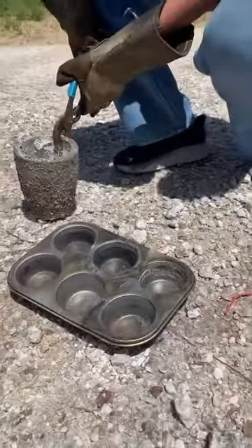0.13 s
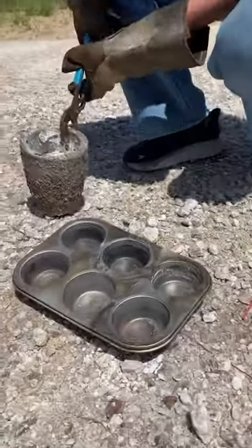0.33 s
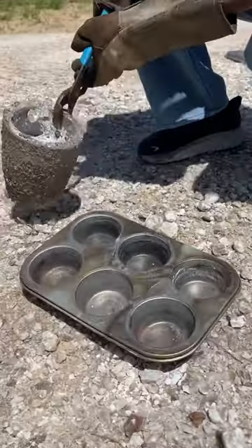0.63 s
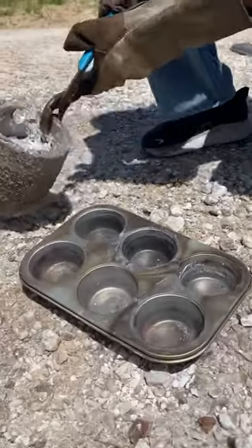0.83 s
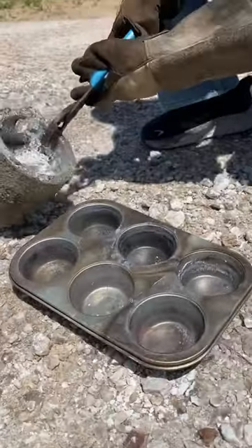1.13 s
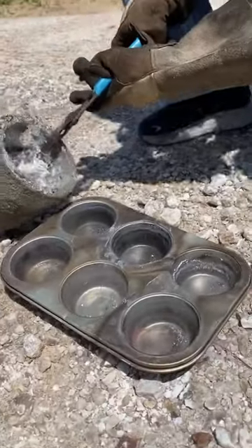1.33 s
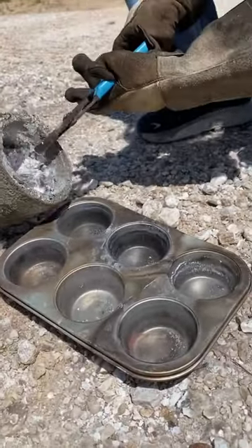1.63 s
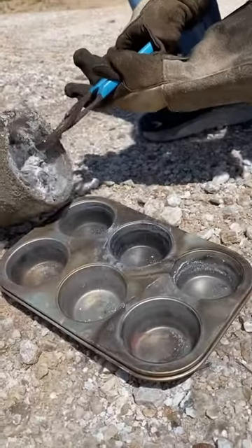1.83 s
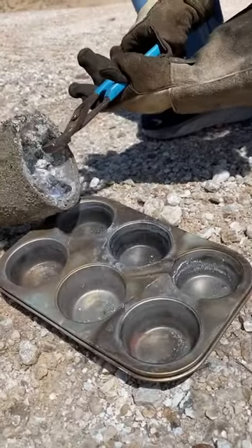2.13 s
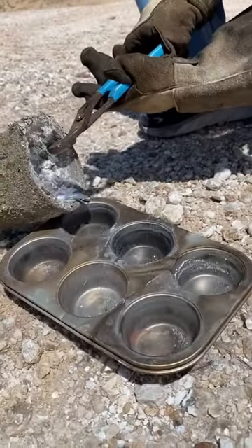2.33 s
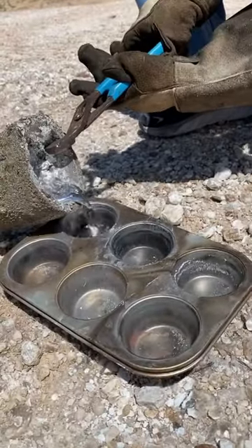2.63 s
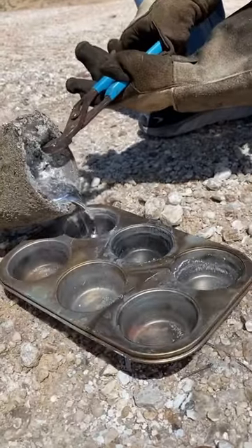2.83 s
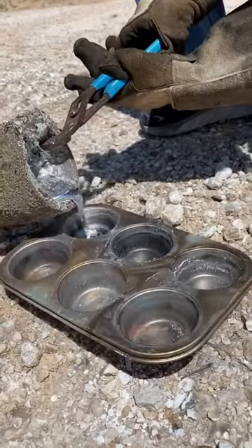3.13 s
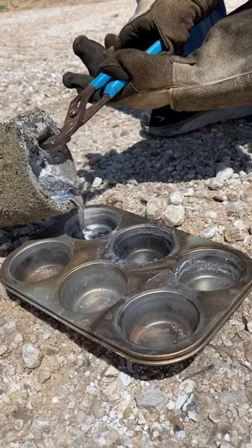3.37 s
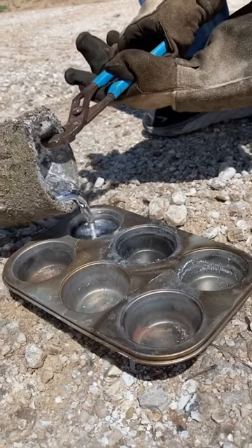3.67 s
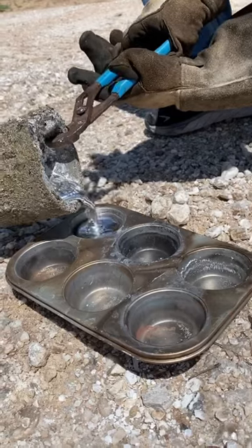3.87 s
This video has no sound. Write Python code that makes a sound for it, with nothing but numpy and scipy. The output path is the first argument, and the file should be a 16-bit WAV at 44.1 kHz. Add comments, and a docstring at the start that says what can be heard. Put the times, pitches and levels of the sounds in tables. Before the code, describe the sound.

Outdoors, close and dry: wind rumbles on the microphone and grit crunches, then a bright tinny clank with quick bounces and a thin clink, a brief stuttering scrape, and very faint sizzling to the end.

```python
"""Wind buffets the microphone outdoors and grit crunches underfoot, over soft air hiss and faint hums.
A crucible in tongs clanks on a steel muffin tin: cracks, ringing modes, a clink and a stick-slip scrape.
Molten metal is a faint sizzle of random spits that lies under it all and grows towards the end.
Sharp ticks, one in the grit and two from the metal, are tiny noise puffs; the wind is shaped noise
plus single low thumps."""
import sys
import numpy as np
from scipy import signal
from scipy.fft import rfft, irfft
from scipy.io import wavfile
from scipy.ndimage import uniform_filter1d

SR = 44100
rng = np.random.default_rng(int(sys.argv[2]) if len(sys.argv) > 2 else 0)


def output_pcm(signal):
    """Save a mono or channel-first signal as 16-bit PCM at the path in sys.argv[1].

    Samples are clipped to [-1, 1] before scaling.
    """
    pcm = np.clip(np.atleast_2d(signal).T, -1, 1) * 32767
    wavfile.write(sys.argv[1], SR, np.round(pcm).astype(np.int16))


N = 176400

# Strongest modes of the steel tin. Each row: frequency in Hz, level in dB, t60 in seconds.
TIN_MODES = [(864, -7, .45), (955, -8, .2), (1181, -2, .33), (1411, -2, .55), (1614, -5, .22),
             (1700, 1, .22), (1828, 1, .22), (2026, 0, .25), (2081, 0, .3), (2467, 5, .22), (2790, -2, .2),
             (2889, -3, .22), (3009, 2, .25), (3097, 3, .35), (3300, -7, .3), (4085, -4, .2),
             (4376, -4, .2), (4673, -4, .22), (5432, -7, .22), (5820, -5, .22), (6017, -2, .16)]
# Strength of the wind at the microphone. Each row: time in seconds, level in dB.
WIND_LEVEL = [(0, -42), (0.1, -29), (0.26, -41), (0.35, -33), (0.43, -48), (0.5, -35), (0.57, -44),
              (0.72, -44), (0.8, -35), (0.92, -38.5), (1.0, -28.5), (1.12, -38), (1.35, -39), (1.46, -51),
              (1.65, -45), (1.86, -42), (1.93, -57), (2.08, -41.5), (2.32, -41), (2.58, -53.5), (2.69, -45),
              (2.95, -44), (3.1, -56), (3.3, -55.5), (3.58, -46.5), (3.65, -51.5), (3.72, -33.5),
              (3.77, -51), (3.86, -34.5), (3.91, -42), (3.965, -28), (4, -50)]
# Size of the unlike part of left and right, relative to the part they share
WIND_APART, AIR_APART, HIT_APART = 0.13, 0.38, 0.24
EDGE_HZ = 16000  # upper limit of the sound


def amp(db):
    """Decibels to gain."""
    return 10 ** (np.asarray(db) / 20)


def unit(x):
    """Scales to an rms of 1."""
    return x / np.sqrt(np.mean(x ** 2) + 1e-20)


def spectrum(points, hz):
    """Reads a table on a log-frequency axis."""
    table_hz, value = np.transpose(points)
    return np.interp(np.log(hz + 1), np.log(table_hz + 1), value)


def curve(points):
    """Reads a table over time, one value per sample."""
    return np.interp(np.arange(N) / SR, *np.transpose(points))


def wander(seconds):
    """Smooth random curve of rms 1 that changes over about this time."""
    span = max(int(seconds * SR), 2)
    once = uniform_filter1d(rng.standard_normal(N), span)
    return unit(uniform_filter1d(once, span))


def add(mix, start_s, sound):
    """Mixes a sound in from a start time, cutting it off at the end of the scene."""
    part = mix[:, round(start_s * SR):][:, :sound.shape[1]]
    part += sound[:, :part.shape[1]]


def pair(shape, apart):
    """Random values for left and right, mostly alike."""
    mid, side = rng.standard_normal((2,) + shape)
    return np.array([mid + apart * side, mid - apart * side])


def colour(x, points):
    """Filters a sound by a table of gains in dB over frequency."""
    hz = np.fft.rfftfreq(x.shape[-1], 1 / SR)
    return irfft(rfft(x) * amp(spectrum(points, hz)), x.shape[-1])


def band(x, centre_hz, octaves):
    """Keeps a bell-shaped band round a centre."""
    hz = np.fft.rfftfreq(x.shape[-1], 1 / SR) + 1
    bell = np.exp(-.5 * (np.log2(hz / centre_hz) / octaves) ** 2)
    return irfft(rfft(x) * bell, x.shape[-1])


def ring(modes, t):
    """Decaying sines of random phase, one row per mode."""
    hz, db, t60 = np.transpose(modes)[:, :, None]
    return amp(db - 60 * t / t60) * np.sin(2 * np.pi * (hz * t + rng.random(hz.shape)))


def bursts(rows, octaves, decay_s, apart):
    """Short dying puffs of noise, each in a broad band round its own centre."""
    out = np.zeros((2, N))
    t = np.arange(-SR // 50, SR // 10) / SR  # room ahead of the onset for the filter's spread
    for start_s, db, centre_hz in rows:
        noise = pair(t.shape, apart) * (t >= 0) * np.exp(-abs(t) / decay_s)
        puff = band(noise, centre_hz, octaves)
        same_energy = np.sqrt(decay_s * SR / np.sum(puff ** 2))
        add(out, start_s + t[0], amp(db) * puff * same_energy)
    return out


def air():
    """The soft hiss of the open air: steady coloured noise with a slowly moving level."""
    # Colour of the hiss. Each row: frequency in Hz, gain in dB.
    air_colour = [(50, 12), (350, 12.5), (900, 2), (2000, -2), (3300, -5), (4600, -4.5), (5100, 1.5),
                  (6500, -7), (8200, -14), (12500, -12.5), (16000, -39)]
    # Loudness of the hiss. Each row: time in seconds, level in dB.
    air_level = [(.6, -56.5), (.9, -59), (1.35, -57.5), (1.6, -61), (2.7, -57.5), (4, -57.5)]
    return amp(curve(air_level)) * unit(colour(pair((N,), AIR_APART), air_colour))


def hum():
    """Faint hollow hums: narrow, wavering bands of noise that swell and fade."""
    # Each row: middle in seconds, level in dB, centre in Hz.
    hum_swells = [(.5, -56, 576), (3.15, -63.5, 568), (3.15, -58, 325)]
    swell_s, octaves = 0.27, 0.16
    out, t = np.zeros((2, N)), np.arange(N) / SR
    for middle_s, db, centre_hz in hum_swells:
        swell = np.exp(-((t - middle_s) / swell_s) ** 2)
        out += amp(db) * swell * unit(band(pair((N,), AIR_APART), centre_hz, octaves))
    return out


def wind():
    """Lumpy low turbulence: deep noise evened out in level, then made to follow the gusts."""
    # Colour of the turbulence. Each row: frequency in Hz, gain in dB.
    wind_colour = [(20, -27), (50, 5), (75, 5.5), (130, -3), (220, -15.5), (700, -49), (4000, -100)]
    lump_db, lump_s = 2.5, 0.027
    flow = colour(pair((N,), WIND_APART), wind_colour)
    power = uniform_filter1d((flow ** 2).mean(0), size=1500)
    flow = flow / np.sqrt(uniform_filter1d(power, size=900))
    return flow * amp(curve(WIND_LEVEL) + lump_db * wander(lump_s))


def eddies():
    """Ragged thumps of eddies whose bass lags; stronger ones reach higher, small ones crowd into gusts."""
    # Single eddies striking the microphone. Each row: time in seconds, peak level in dB.
    strong_eddies = [(.003, -22.5), (.037, -22), (.062, -20), (.073, -23), (.093, -23.5), (.146, -26),
                     (0.159, -23.5), (0.22, -26), (.261, -32), (0.278, -30), (.519, -30.5), (.628, -25.5),
                     (.669, -30.5), (.763, -29), (0.814, -26), (.967, -29), (.978, -27.5), (1.010, -23.5),
                     (1.041, -21.5), (1.051, -24.5), (1.075, -27.5), (1.187, -27.5), (1.235, -29.5),
                     (1.265, -25), (1.338, -36), (1.701, -35), (2.11, -34.5), (2.251, -28.5),
                     (2.608, -39.5), (2.82, -37), (3.094, -40.5), (3.713, -31.5), (3.845, -36.5),
                     (3.948, -29)]
    top_at_0_db_hz, db_per_octave, low_hz = 1352, 17.5, 83  # upper edge, its fall with level, lower edge
    lag_cycles, wake_s, roughness = 1.1, 0.0063, 0.77
    most_per_s, small_db = 110, 0  # small eddies: rate in the strongest gust, peak relative to the wind
    out = np.zeros((2, N))
    t = np.arange(SR // 5) / SR
    hz = np.fft.rfftfreq(SR // 5, 1 / SR) + 1
    gust_db = curve(WIND_LEVEL)
    chance = most_per_s / SR * amp(gust_db - gust_db.max())
    hits = np.flatnonzero(rng.random(N) < chance)
    small_eddies = [(i / SR, gust_db[i] + small_db) for i in hits]
    for strike_s, db in strong_eddies + small_eddies:
        top_hz = top_at_0_db_hz * 2 ** (db / db_per_octave)
        low_edge = 1 + (low_hz / hz) ** 4
        high_edge = np.hypot(1, (hz / top_hz) ** 5)
        size = 1 / hz / low_edge / high_edge
        wake = unit(rfft(pair(t.shape, WIND_APART) * np.exp(-t / wake_s)))
        # Each frequency arrives late by the same number of its own cycles
        lag = np.exp(2j * np.pi * (rng.random() - lag_cycles * np.log(hz)))
        thump = irfft(size * (1 + roughness * wake) * lag)
        add(out, max(strike_s - 1 / top_hz, 0), amp(db) * thump / abs(thump).max())
    return out


def grit():
    """Grit crunching underfoot: each crunch is a short puff of mid-range noise."""
    # Each row: start in seconds, level in dB, centre in Hz.
    grit_crunches = [(.4065, -44.5, 1400), (.4455, -46, 2170), (.6314, -48.5, 1420), (.6595, -44.5, 1240),
                     (.6882, -44, 1860), (1.084, -52, 1190), (1.1093, -47.5, 1040), (1.1936, -51, 1270),
                     (1.254, -53, 1700)]
    return bursts(grit_crunches, octaves=0.57, decay_s=0.0041, apart=HIT_APART)


def ticks():
    """Sharp ticks, first the click of a grit crunch, then two of the metal: very short, wide, bright puffs."""
    # Each row: start in seconds, level in dB, centre in Hz.
    tick_hits = [(.447, -39, 4200), (2.4182, -37.5, 3300), (3.6866, -34, 4600)]
    return bursts(tick_hits, octaves=0.93, decay_s=0.00066, apart=HIT_APART)


def pour():
    """Tiny spits of molten metal sizzle in uneven surges and set the tin ringing faintly."""
    # The running metal. Each row: time in seconds, level in dB.
    pour_level = [(2.3, -69.5), (2.5, -66.5), (3.1, -68.5), (3.45, -65), (4, -65.5)]
    # Colour of the sizzle. Each row: frequency in Hz, gain in dB.
    sizzle_colour = [(700, -10.5), (1400, -1), (2200, 0.5), (3200, -15), (11000, -13), (16000, -52)]
    drops_per_s, spread_db = 1000, 1
    surge_db, surge_s = 2, 0.036
    ring_db = -10  # relative to the sizzle
    landing = rng.random(N) < drops_per_s / SR
    extra_db = spread_db * np.minimum(rng.exponential(1, N), 4)
    drops = pair((N,), AIR_APART) * landing * amp(extra_db)
    drops = drops * amp(surge_db * wander(surge_s))
    tin_ring = ring(TIN_MODES, np.arange(SR // 4) / SR).sum(0)
    body = signal.oaconvolve(drops, tin_ring[None], axes=1)[:, :N]
    return amp(curve(pour_level)) * (unit(colour(drops, sizzle_colour)) + amp(ring_db) * unit(body))


def scrape():
    """The lip sticks and slips: each slip is a short rasp and a choked ring of modes near its pitch."""
    # The crucible's lip slips along the rim. Each row: start in seconds, level in dB, centre in Hz.
    lip_slips = [(2.833, -42, 1670), (2.839, -51.5, 3450), (2.848, -46, 5160), (2.8532, -35, 1720),
                 (2.8586, -39.5, 1180), (2.8729, -40.5, 1280), (2.8861, -41.5, 1060)]
    octaves, rasp_s = 0.58, 0.0051
    ring_db, ring_s = 0.5, 0.025  # ring peak relative to the slip's level, and the time that chokes it
    out, t = np.zeros((2, N)), np.arange(SR // 4) / SR
    mode_hz = np.transpose(TIN_MODES)[0]
    for start_s, db, centre_hz in lip_slips:
        reach = np.exp(-abs(np.log2(mode_hz / centre_hz)) / octaves)
        tones = reach @ ring(TIN_MODES, t) * np.exp(-t / ring_s)
        add(out, start_s, amp(db + ring_db) * np.tile(tones / abs(tones).max(), (2, 1)))
    return out + bursts(lip_slips, octaves, rasp_s, HIT_APART)


def tongs():
    """One thin clink of steel: a few decaying modes, alike on both sides."""
    # Modes of the tongs. Each row: frequency in Hz, level in dB.
    tongs_modes = [(2649, 0.5), (2762, -10), (7650, 1), (10550, -5)]
    start_s, clink_db, t60 = 2.2666, -42.5, 0.16
    out, t = np.zeros((2, N)), np.arange(SR // 3) / SR
    clink = ring([(hz, db, t60) for hz, db in tongs_modes], t).sum(0)
    add(out, start_s, amp(clink_db) * np.tile(clink, (2, 1)))
    return out


def tin(count=320):
    """Each knock is a brief crack, then the tin's strong modes and a thicket of weaker ones."""
    # Crucible on the tin. Each row: start in seconds, level in dB, brightness in dB per octave,
    # ring length as a share of the free ring.
    tin_knocks = [(2.1666, -26, 1, 0.96), (2.1785, -42.5, 4.5, 0.36), (2.1874, -32.5, 0.5, 0.32),
                  (2.196, -33.5, -1.5, 0.36), (2.268, -44, 6.5, 1.56), (2.3038, -34.5, -1.5, 0.61),
                  (2.4493, -53.5, 1.5, 0.92), (2.7262, -53, 6.5, 0.89), (2.749, -57.5, 9, 1.5)]
    # Dense weaker modes of the sheet. Each row: frequency in Hz, level in dB.
    sheet_colour = [(300, 6.5), (650, -6), (850, 5), (1800, -1), (3600, -5.5), (6300, -1.5), (10000, -8.5),
                    (13000, -9), (16000, -18)]
    # Decay of the sheet. Each row: frequency in Hz, t60 in seconds.
    sheet_t60 = [(300, 0.32), (1500, 0.32), (9000, 0.23), (16000, .08)]
    modes_db, sheet_db, crack_db = -6, -6, 0
    spread_db, crack_s, attack_s = 2, 0.0052, 0.0009
    out, t = np.zeros((2, N)), np.arange(SR // 2) / SR
    # One weak mode at a random place in each of many steps, even on a square-root frequency axis
    edges = np.linspace(np.sqrt(sheet_colour[0][0]), np.sqrt(EDGE_HZ), count)
    hz = (edges + rng.random(count) * (edges[1] - edges[0])) ** 2
    uneven_db = spread_db * np.clip(rng.standard_normal(count), -2, 1.5)
    weak_db = spectrum(sheet_colour, hz) + 10 * np.log10(hz) + uneven_db
    thicket = ring(np.transpose([hz, weak_db, spectrum(sheet_t60, hz)]), t)
    strong, strong_hz = ring(TIN_MODES, t), np.transpose(TIN_MODES)[0]
    for start_s, db, tilt_db, share in tin_knocks:
        sheet = pair((count,), HIT_APART) * amp(tilt_db * np.log2(hz)) @ thicket
        tones = amp(tilt_db * np.log2(strong_hz)) @ strong
        # Level both by their first 10 ms
        sheet, tones = (v / np.std(v[..., t < .01]) for v in (sheet, tones))
        noise = colour(pair(t.shape, HIT_APART), sheet_colour)
        crack = unit(noise) * np.exp(-t / crack_s) * amp(tilt_db)
        # Shares below 1 choke the ring, shares above 1 stretch it
        extra_decay = 1 / np.clip(share, .1, 1.3) - 1
        damping = amp(-60 * t / sheet_t60[1][1] * extra_decay)
        body = (amp(sheet_db) * sheet + amp(modes_db) * tones) * damping
        attack = np.minimum(t / attack_s, 1)
        add(out, start_s, amp(db) * (body + amp(crack_db) * crack) * attack)
    return out


def scene():
    """Everything is close and dry: there are no walls."""
    outdoors = air() + hum() + wind() + eddies()
    metal = pour() + scrape() + tongs() + tin()
    return outdoors + grit() + ticks() + metal


def record(dry):
    """The two microphone ports differ in phase; then a low cut and the band limit."""
    # Phase by which the left port leads. Each row: frequency in Hz, phase in radians.
    port_phase = [(1900, 0), (2700, .8), (4300, .8), (5100, 0), (7000, 3.05), (7800, 3.25), (9900, 6.2),
                  (11500, 6.4), (12700, 9.3), (14400, 9.6), (15400, 12.5)]
    low_cut_hz = 30
    hz = np.fft.rfftfreq(2 * N, 1 / SR)
    phase = spectrum(port_phase, hz)
    low_cut = 1 / np.sqrt(1 + (low_cut_hz / (hz + 1)) ** 8)
    turn = np.exp(.5j * np.array([phase, -phase]))  # half the lead on each side
    ports = irfft(rfft(dry, 2 * N) * low_cut * turn)[:, :N]
    band_limit = signal.firwin(255, EDGE_HZ, window=("kaiser", 9), fs=SR)
    return signal.oaconvolve(ports, band_limit[None], "same")


dry = scene()
out = record(dry)
output_pcm(out)
```